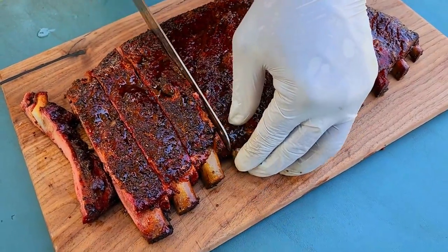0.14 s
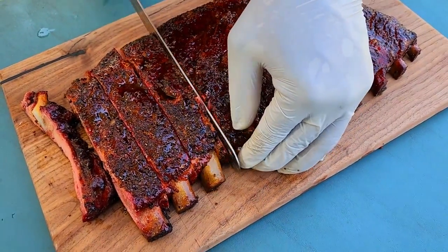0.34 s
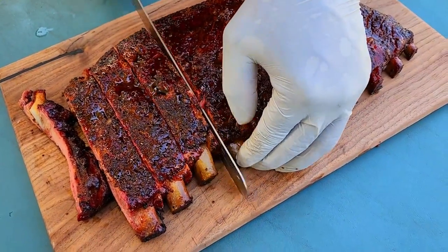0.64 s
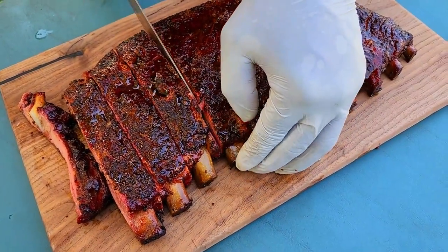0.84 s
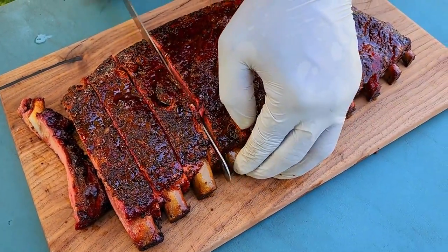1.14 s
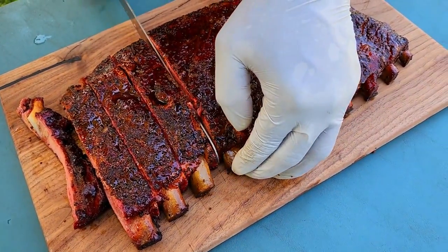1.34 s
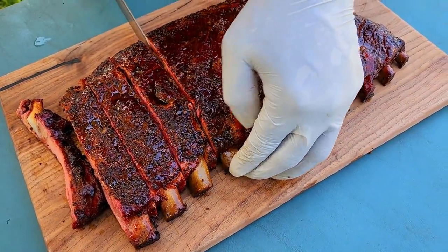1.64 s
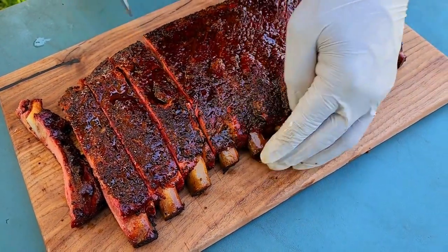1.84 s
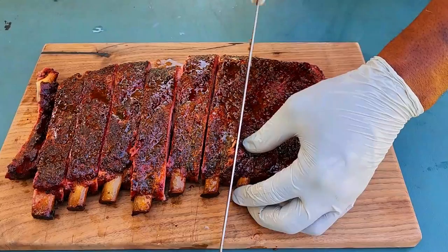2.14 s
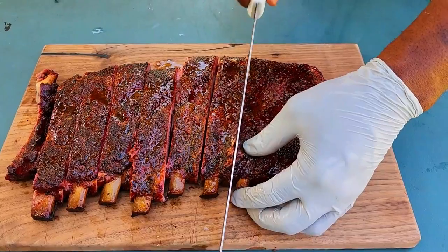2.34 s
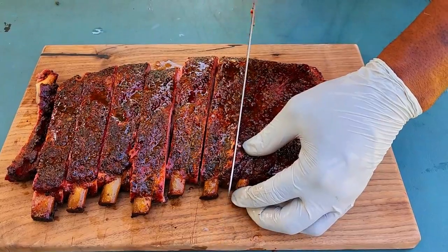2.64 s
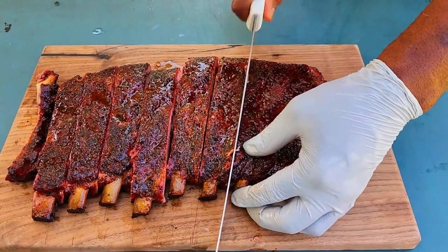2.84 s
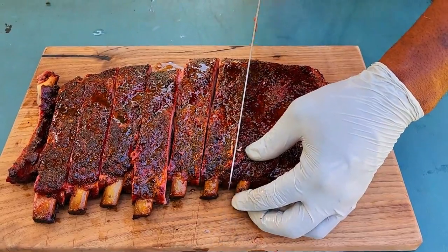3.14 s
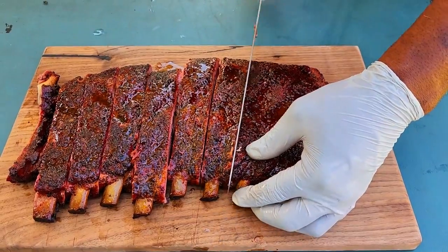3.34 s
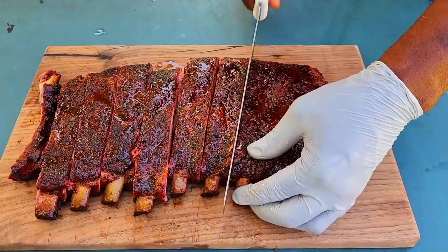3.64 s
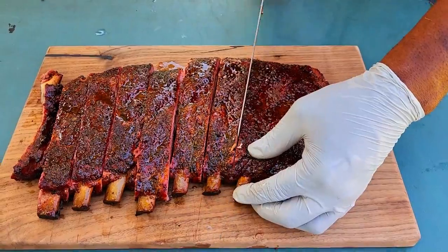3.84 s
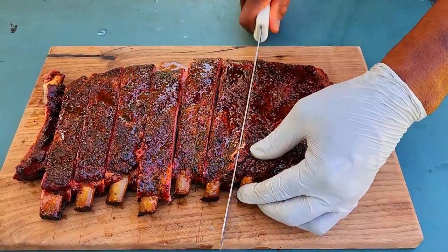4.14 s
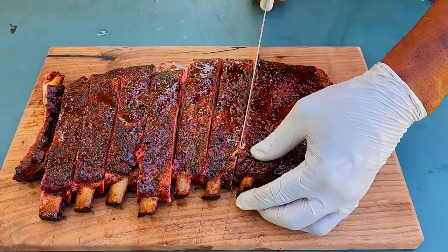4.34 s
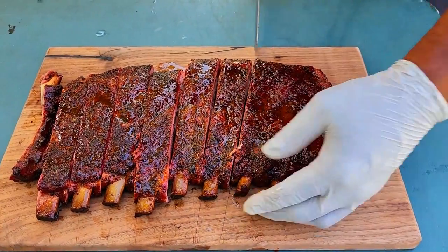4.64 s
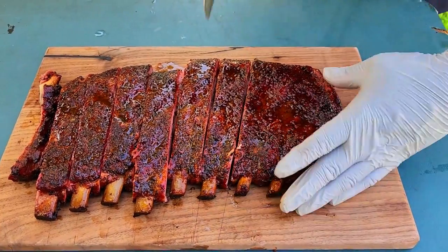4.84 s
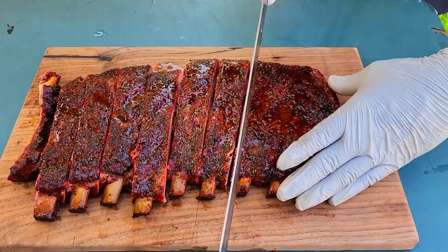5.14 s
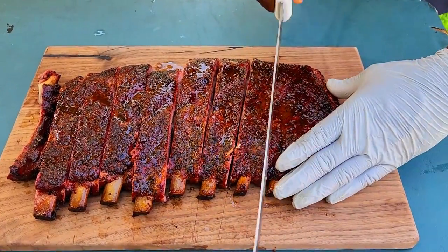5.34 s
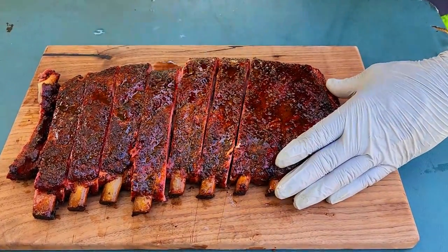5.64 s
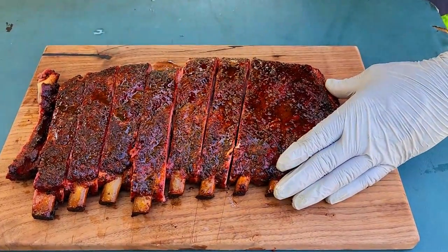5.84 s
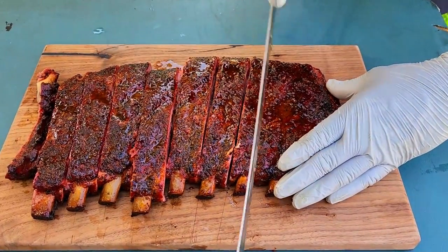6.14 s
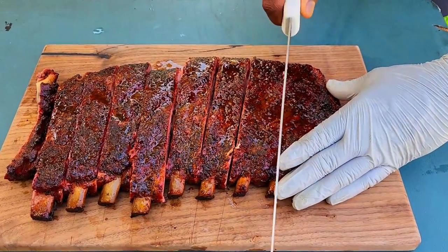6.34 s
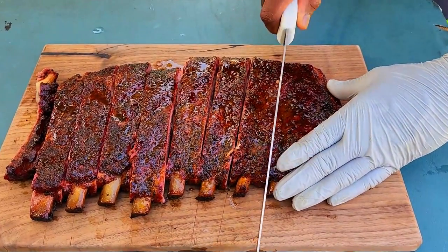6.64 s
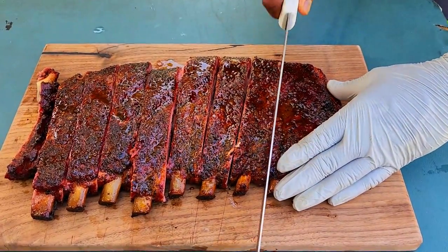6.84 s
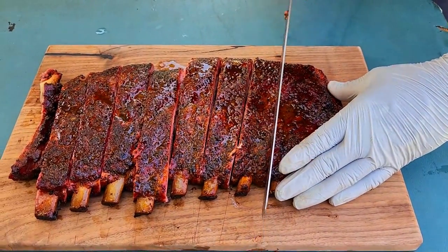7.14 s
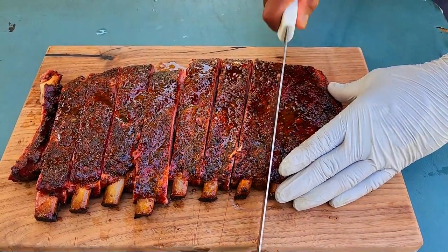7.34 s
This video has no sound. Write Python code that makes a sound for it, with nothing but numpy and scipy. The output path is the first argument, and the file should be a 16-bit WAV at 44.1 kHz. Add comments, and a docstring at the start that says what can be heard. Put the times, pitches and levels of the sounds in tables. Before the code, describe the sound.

Outdoors, close stereo microphones, with a soft low motor rumble and hum throughout. Around 0.4 s a long knife bites into crusty ribs: a sharp knock on the wooden board at 0.5, then a brief scrape and light snaps of crust. Short rasping strokes follow from 1.15 to 1.9, woody with a ringing blade, then fainter crackle. At 2.2 the edge skips in a quick run of knocks, with another small run near 2.5 and hard taps at 2.8-2.9. Scrapes return from 3.4, growing busy between 4.0 and 4.75, with a crisp snap at 4.13. Insects' throbbing hiss swells to its peak near 4.2 and stays. The knife rests from about 5 s; a single insect holds a thin high note around 6.3-6.8. Thin, falling bird whistles come at 2.3, 3.6, 6.2, 7.1 and 7.4. A final scraping stroke rattles rapidly on wood from 7.3 to the end at 7.5.

```python
"""A long knife saws through barbecued ribs on a wooden board outdoors, close by, over hum and insects.
From the first half second its blade crackles through the crust and scrapes the wood: filtered random clicks.
In places it skips in quick runs of knocks, which are short clicks that ring the wood and the blade.
The insects, throbbing noise, swell loudest near 4 s; then the knife rests until a last stroke after 7 s.
A small bird whistles thinly from 2 s on, and for a moment after 6 s one insect holds a thin note."""
import sys
import numpy as np
from scipy import signal
from scipy.fft import rfft, irfft, next_fast_len
from scipy.io import wavfile
from scipy.ndimage import uniform_filter1d

SR = 44100
rng = np.random.default_rng(int(sys.argv[2]) if len(sys.argv) > 2 else 0)


def int16_out(signal):
    """Quantize to a 16-bit WAV file."""
    q = np.round(np.clip(np.atleast_2d(signal).T, -1, 1) * 32767)
    wavfile.write(sys.argv[1], SR, q.astype(np.int16))


N = 330309
TIME = np.arange(N) / SR

# strokes of the knife, with levels at the stroke's end, before each layer's own trim:
# (start [s], attack [s], hold [s], release [s], scrape level [dB], drag level [dB], crust level [dB],
#  blade pitch [Hz], blade ring [dB], juicy fizz [dB], upper ring pitch [Hz], upper ring [dB],
#  pitch muted by the contact [Hz], ring of bare wood [dB], drag pitch [Hz])
KNIFE_STROKES = [(0.39, 0.047, 0.05, 0.018, -49, -45, -56.5, 840, 5, -0.5, 1300, -6, 480, -9, 200),
                 (0.487, 0.0097, 0.048, 0.082, -28.5, -31.5, -42.5, 884, 9.5, 0.5, 1720, 12, 470, -8, 152),
                 (0.67, 0.055, 0.042, 0.021, -40.5, -46, -49, 810, 15, 0, 1740, 8, 480, -18, 200),
                 (1.141, 0.013, 0.035, 0.023, -45, -56, -50, 830, 4, 0.5, 1870, 11, 360, -10, 250),
                 (1.19, 0.017, 0.043, 0.045, -33, -43.5, -42.5, 835, 3, 0.5, 1110, -7, 363, -8, 496),
                 (1.247, 0.035, 0.032, 0.04, -37.5, -45, -50.5, 820, 4, 0.5, 1920, 14, 370, -2, 460),
                 (1.368, 0.093, 0.14, 0.066, -35, -40, -45, 830, 11.5, -0.5, 1800, -7, 1060, -6, 527),
                 (1.59, 0.058, 0.11, 0.1, -35, -40, -51, 774, 4.5, 1.5, 1610, 5, 1070, -12, 513),
                 (1.788, 0.033, 0.04, 0.048, -36.5, -39, -64, 610, 5, 0, 1590, 3, 1160, -9, 373),
                 (1.863, 0.16, 0.14, 0.025, -64, -64, -54.5, 790, 22, 0.5, 1400, -6, 1100, -10, 250),
                 (2.2, 0.013, 0.062, 0.079, -29.5, -31, -53, 1010, -1, 0, 1660, 0, 840, 2, 260),
                 (2.445, 0.029, 0.021, 0.043, -40.5, -54, -52.5, 1000, 13, -6, 1640, 4, 840, -2, 260),
                 (2.831, 0.0051, 0.035, 0.041, -30, -34, -54, 1010, -3, 0.5, 1440, -0.5, 517, -4, 280),
                 (2.865, 0.02, 0.027, 0.057, -31, -27.5, -46, 990, 9, -5.5, 1710, 4, 520, -7, 279),
                 (2.946, 0.024, 0.12, 0.09, -56, -62, -53, 1100, -3, -14, 1720, 6, 600, -7, 260),
                 (3.426, 0.051, 0.046, 0.056, -35.5, -45, -40.5, 1080, -0.5, -10, 2010, -7, 890, 4, 298),
                 (3.56, 0.17, 0.19, 0.12, -52.5, -78, -55.5, 1100, 11, 4.5, 1920, -2, 810, -4, 280),
                 (3.978, 0.083, 0.055, 0.042, -37, -45.5, -45.5, 695, 6, -2, 1890, -3, 900, -7, 280),
                 (4.124, 0.021, 0.058, 0.047, -28.5, -33.5, -42.5, 970, -6, 2, 1820, 20, 775, 8, 284),
                 (4.225, 0.043, 0.016, 0.017, -46, -62, -53, 1000, -3, -0.5, 1780, 3, 950, 14, 280),
                 (4.33, 0.022, 0.068, 0.05, -40.5, -52, -42.5, 1030, -11, 0.5, 1780, 7, 1140, 5, 300),
                 (4.398, 0.048, 0.21, 0.016, -35, -52, -45.5, 970, 8, -0.5, 1680, -8, 1150, -8, 450),
                 (4.652, 0.0044, 0.037, 0.014, -25, -41.5, -49.5, 1030, 16, 0, 1250, -2, 460, 5, 557),
                 (4.694, 0.019, 0.017, 0.02, -31, -38, -50, 1090, 14, -3, 1820, 13, 480, 6, 258),
                 (4.715, 0.023, 0.051, 0.16, -59, -66, -53, 1080, 0, 0, 1800, 5, 600, 0, 260),
                 (7.325, 0.016, 0.054, 0.057, -25.5, -28.5, -49, 1030, 6, -2, 1680, 4, 825, 1, 262)]
# the edge knocks on the board, alone or in skipping runs:
# (time [s], level [dB], thud against the level [dB], contact pitch [Hz], ring of the blade [dB])
EDGE_KNOCKS = [(0.4911, -11, -7, 754, 0), (0.511, -28, -9, 865, 7), (0.5255, -21, -20, 900, 14),
               (0.554, -28, -6, 854, 12), (0.682, -41, 3, 804, 1), (1.7105, -28, -7.5, 776, 3),
               (2.2, -23.5, -1, 986, 6), (2.2136, -14, -8.5, 1420, -17), (2.234, -23.5, 4, 980, -4),
               (2.255, -28.5, 5, 1020, -6), (2.2769, -26.5, 3, 1300, -11), (2.284, -34, -2, 1280, -11),
               (2.3064, -30, 2.5, 990, -8.5), (2.463, -40.5, -2, 1710, 1), (2.4807, -27.5, -2, 1330, -18),
               (2.4997, -31.5, -2, 1580, -1), (2.8336, -24.5, 0, 1310, -17), (2.862, -28, -5, 1380, 7),
               (2.89, -15.5, -6.5, 975, -2), (2.9087, -17, -7, 970, -2), (3.027, -43, -2, 656, 12),
               (3.652, -43.5, -4, 800, 0), (4.132, -24, 3.5, 650, -4), (4.662, -27, -16, 650, 6),
               (4.7164, -27, -13, 1110, -4), (7.330, -18, -4.5, 1300, -12), (7.3468, -18.5, -2, 1015, -2),
               (7.3623, -13.5, -3.5, 1260, -8), (7.378, -14, -2.5, 1033, -7.5),
               (7.3946, -23.5, 4.5, 1640, 4), (7.413, -27.5, 1.5, 1020, -2), (7.424, -36, -3, 1500, -2),
               (7.439, -38.5, 2.5, 1100, -2)]
# narrow modes of the board, woken by the edge on bare wood: (pitch [Hz], width [Hz], level [dB])
WOOD_MODES = [(714, 70, -8.5), (947, 34, -5.5), (1030, 44, 5.5), (1226, 30, 0), (1340, 82, -3),
              (1710, 41, -2.5), (1860, 42, 2.5), (1975, 26, -1.5), (2203, 25, 7.5), (2316, 27, -2)]
# high modes of the blade: (pitch [Hz], width [Hz], level [dB])
STEEL_MODES = [(5470, 100, 2), (6250, 64, 3), (7460, 200, 0), (7740, 130, -15)]
# left-right likeness of the board's sound: (frequency [Hz], likeness [-1..1])
NEAR_LIKENESS = [(200, 0.99), (700, 0.97), (1100, 0.93), (1800, 0.62), (2700, 0.042), (16000, 0.013)]
# left-right likeness of the background: (frequency [Hz], likeness [-1..1])
FAR_LIKENESS = [(30, 1), (75, 0.97), (135, 1), (280, 0.72), (600, 0.46), (1200, -0.15), (3000, -0.031),
                (16000, -0.11)]


def from_db(db):
    """Decibels to gain."""
    return 10 ** (np.asarray(db) / 20)


def rms_one(x):
    """Scale to unit rms (average strength)."""
    return x / np.sqrt(np.mean(x ** 2) + 1e-20)


def peak_one(x):
    """Scale to unit peak."""
    return x / (np.abs(x).max() + 1e-20)


def even(x, size):
    """Hold the loudness steady over a window of size samples."""
    return x / np.sqrt(uniform_filter1d(np.mean(x ** 2, axis=0), size=size) + 1e-20)


def in_time(rows):
    """Turn the columns of a timed table into curves, sample by sample."""
    s, *columns = np.transpose(rows)
    return [np.interp(TIME, s, c) for c in columns]


def frequencies(size):
    """The frequencies [Hz] of a spectrum of size samples."""
    return np.arange(size // 2 + 1) * SR / size


def at_hz(points, hz):
    """Read a table of frequencies on a log-frequency axis."""
    f, value = np.transpose(points)
    return np.interp(np.log(hz + 1), np.log(f), value)


def add(out, s, sound):
    """Mix a sound in at time s."""
    i = max(0, round(s * SR))
    out[:, i:i + sound.shape[-1]] += sound[..., :max(0, N - i)]


def drift(rate):
    """A random curve of rms 1, with rate new random points per second."""
    knots = rng.standard_normal(int(N / SR * rate) + 2)
    return rms_one(np.interp(TIME * rate, np.arange(len(knots)), knots))


def noise():
    """Two channels of plain hiss."""
    return rng.standard_normal((2, N))


def grains(per_s, size_db):
    """Two streams of random clicks of uneven size."""
    sizes = from_db(size_db * np.minimum(rng.exponential(1, (2, N)), 4))
    return (rng.random((2, N)) < per_s / SR) * sizes * rng.choice([-1, 1], (2, N))


def low_pass(x, hz, order=2):
    """Take away what lies above hz (Butterworth filter)."""
    return signal.sosfilt(signal.butter(order, min(hz, .45 * SR), fs=SR, output="sos"), x)


def resonate(x, hz, width_hz):
    """One resonance, gain 1 on top."""
    r = np.exp(-np.pi * width_hz / SR)
    feed = np.array([1, 0, -1]) * (1 - r * r) / 2
    back = [1, -2 * r * np.cos(2 * np.pi * hz / SR), r * r]
    return signal.lfilter(feed, back, x + 1e-18)


def modes(x, table):
    """Parallel resonances from rows (pitch, width, level)."""
    return sum(from_db(db) * resonate(x, hz, width) for hz, width, db in table)


def glide(x, hz, width_hz):
    """A resonance whose centre follows a curve: shift it down to 0 Hz, smooth, shift back."""
    turn = np.exp(2j * np.pi * np.cumsum(hz) / SR)
    r = np.exp(-np.pi * width_hz / SR)
    return 2 * (turn * signal.lfilter([1 - r], [1, -r], x / turn)).real


def spread(pair, likeness, spectrum=((20, 0), (20000, 0))):
    """Two unrelated signals become left and right, with a colour and a likeness per frequency."""
    size = next_fast_len(pair.shape[-1])
    hz = frequencies(size)
    mid, side = rfft(pair, size) * from_db(at_hz(spectrum, hz))
    alike = np.clip(at_hz(likeness, hz), -1, 1)
    both = np.sqrt(1 + alike) * mid + np.sqrt(1 - alike) * side * [[1], [-1]]
    return rms_one(irfft(both, size)[:, :pair.shape[-1]])


def strokes():
    """Each stroke presses in, holds and lets go; gives the gains of scrape, drag and crust."""
    press_curve = 1.19   # above 1, pressure comes and goes with a soft foot
    # order: scrape, drag, crust
    # change over a stroke: the drag grows, the crust grows slightly, the scrape holds
    change_db = np.array([[0], [1.5], [0.5]])
    rest_db = [[-76], [-75], [-69]]   # faint rubbing between strokes
    gains = np.zeros((3, N))
    for start, attack, hold, release, *levels_db in np.array(KNIFE_STROKES)[:, :7]:
        length = attack + hold + release
        t = TIME[:int(length * SR)]
        ramps = np.minimum(t / attack, (length - t) / release)
        press = np.clip(ramps, 0, 1) ** press_curve
        add(gains, start, press * from_db(np.c_[levels_db] + change_db * (t / length - 1.0)))
    return np.hypot(gains, from_db(rest_db))


def contact():
    """Pitches, rings and juiciness of the cut glide from the middle of one stroke to the next."""
    return in_time([(row[0] + row[1] + row[2] / 2, *row[7:]) for row in KNIFE_STROKES])


def board(x, top_hz=2050):
    """The wood passes the push on, rings in its modes and radiates little treble."""
    # resonances of the board on its table: (pitch [Hz], width [Hz], level over the direct sound [dB])
    board_modes = [(119, 41, 13.5), (193, 85, 7), (307.5, 46, 7.5), (627, 130, 5.5), (988, 180, -1.5),
                   (1340, 227, 9), (1700, 28, -5)]
    return low_pass(x + modes(x, board_modes), top_hz, order=10)


def scrape(gain, blade_hz, blade_db, upper_hz, upper_db, node_hz, wood_db):
    """The edge catches on the grain in dense, tiny slips that ring blade and wood; one pitch is muted."""
    # colour of the slips: (frequency [Hz], level [dB per Hz])
    slip_spectrum = [(200, -52), (350, -16.5), (470, 1), (600, -1.5), (800, 3), (1120, -2), (1500, -4),
                     (1950, -2), (2500, 0), (4000, 11)]
    node_depth, judder_db, trim_db = 0.39, 1.0, -5
    jitter = from_db(0.26 * drift(25))   # the contact point is never still
    slips = spread(grains(per_s=7000, size_db=1.5), NEAR_LIKENESS, slip_spectrum)
    blade = from_db(blade_db) * glide(slips, blade_hz * jitter, width_hz=120)
    upper = from_db(upper_db) * glide(slips, upper_hz * jitter, width_hz=160)
    bare_wood = from_db(wood_db) * modes(slips, WOOD_MODES)
    rasp = board(slips + blade + upper + bare_wood)
    rasp = rasp - node_depth * glide(rasp, node_hz, width_hz=170)
    return gain * even(rasp, size=400) * from_db(judder_db * drift(110) + trim_db)


def drag(gain, drag_hz, width_hz=240, trim_db=-5.5):
    """The blade drags on the board with a low growl whose pitch follows the contact."""
    slips = spread(grains(per_s=3000, size_db=2.5), NEAR_LIKENESS)
    growl = board(glide(glide(slips, drag_hz, width_hz), drag_hz, width_hz))
    return gain * even(growl, size=1024) * from_db(trim_db)


def bearing(touch_s=0.0091, airborne_db=-9):
    """How firmly the edge bears on the wood: while it skips, it rubs fully only around each knock."""
    # spells in which the edge skips over the wood: (from [s], to [s])
    skip_spells = [(2.195, 2.34), (2.45, 2.52), (2.895, 2.909), (7.325, 7.42)]
    firm, touches, t = np.ones(N), np.zeros((1, N)), TIME[:2 ** 11]
    for start, end in skip_spells:
        firm[(TIME > start) & (TIME < end)] = from_db(airborne_db)
    for s, *_ in EDGE_KNOCKS:
        add(touches, s, np.exp(-(t / touch_s) ** 2))
    return uniform_filter1d(np.maximum(firm, touches[0]), size=64)


def bend(x, delay_s=0.00149, ref_hz=300):
    """Bending waves: travel time falls with the root of frequency, so the thud follows the crack."""
    size = x.shape[-1]
    phase = 4 * np.pi * delay_s * np.sqrt(ref_hz * frequencies(size))
    return irfft(rfft(x) * np.exp(-1j * phase), size)


def knocks():
    """Each knock cracks on the wood, rings the blade and thuds; crack and thud echo from the far edge."""
    thud_low_hz, thud_hz = 150, 470
    thud_echo_s, thud_echo_db, crack_echo_s, crack_echo_db = 0.0057, -10, 0.0068, -14
    wood_db, steel_db, steel_t60_s = -3, -25, 0.1   # t60: time to fade by 60 dB
    out, t = np.zeros((2, N)), TIME[:2 ** 13]
    click = signal.unit_impulse(len(t))
    push = signal.sosfilt(signal.butter(1, [thud_low_hz, thud_hz], "band", fs=SR, output="sos"), click)
    thud = peak_one(bend(board(low_pass(push, thud_hz))))
    thud = thud + from_db(thud_echo_db) * np.interp(t - thud_echo_s, t, thud)
    for s, db, heavy_db, hz, ring_db in EDGE_KNOCKS:
        hit = resonate(click, hz, width_hz=1500)
        crack = peak_one(bend(board(hit + from_db(wood_db) * modes(hit, WOOD_MODES))))
        late = crack_echo_s * rng.uniform(0.86, 1.15)
        crack = crack + from_db(crack_echo_db) * np.interp(t - late, t, crack)
        # two resonances in a row: the ring builds up over a few cycles
        ring = peak_one(bend(resonate(resonate(click, hz, 100), hz, 500)))
        blow = peak_one(crack + from_db(ring_db) * ring) + from_db(heavy_db) * thud
        # treble straight from the blade
        burst = rng.standard_normal((2, len(t))) * from_db(-60 * t / steel_t60_s)
        bright = resonate(burst, 2500, 2200)
        steel = peak_one(low_pass(bright + modes(bright, STEEL_MODES), 10000, order=6))
        add(out, s, from_db(db) * (blow + from_db(steel_db) * steel))
    return out


def radiate(x, table):
    """Each pitch leaves the board with its own lead and balance between left and right."""
    size, apart = next_fast_len(N), np.array([[.5], [-.5]])
    hz, table = frequencies(size), np.array(table)
    lead = at_hz(table[:, [0, 1]], hz)
    balance_db = at_hz(table[:, [0, 2]], hz)
    turned = from_db(apart * balance_db) * np.exp(1j * apart * lead)
    return irfft(rfft(x, size) * turned, size)[:, :N]


def crust(crust_gain, fizz_db):
    """Crust and fibres part in clumps of minute cracks that make the steel sing; juice fizzes above."""
    # colour of the cracks: (frequency [Hz], level [dB per Hz])
    crack_spectrum = [(1500, -11), (2700, -1.5), (3400, -2.5), (4600, 2), (5600, 2.5), (7500, -2.5),
                      (8300, -6.5), (9000, -30), (12000, -45), (16500, -36)]
    # colour of the juice: (frequency [Hz], level [dB per Hz])
    fizz_spectrum = [(5000, -24), (8000, -10), (10000, -16.5), (12500, -17), (14300, -18.5), (16500, -7)]
    focus_db, clump_db, fizz_trim_db = 8, 1.1, -5.5
    centre_hz = 7380 * 2 ** (0.67 * fizz_db)   # the juicier the cut, the higher it crackles
    cracks = spread(grains(per_s=4000, size_db=2.0), NEAR_LIKENESS, crack_spectrum)
    cracks = cracks + from_db(focus_db) * glide(cracks, centre_hz, width_hz=1300)
    cracks = rms_one(cracks + modes(cracks, STEEL_MODES))
    fizz = spread(noise(), NEAR_LIKENESS, fizz_spectrum) * from_db(fizz_db + fizz_trim_db)
    return (cracks + fizz) * crust_gain * from_db(clump_db * drift(130))


def snaps(tick_t60_s=0.011, edge_t60_s=0.0084, edge_db=-18):
    """A larger flake breaks: a sharp broad edge with a short tick that is duller the lower it is."""
    # bits of crust snap: (time [s], level [dB], pitch [Hz])
    flakes = [(0.365, -53, 8400), (0.491, -32, 5600), (0.606, -34.5, 7240), (0.635, -30, 2100),
              (0.930, -39, 6800), (1.134, -32, 1500), (1.135, -32, 6760), (1.161, -28, 6600),
              (3.007, -36, 2200), (4.128, -18, 5660), (4.737, -30.5, 7760), (4.879, -35, 1960),
              (7.365, -32, 6600)]
    out, t = np.zeros((2, N)), TIME[:2 ** 11]
    for s, db, hz in flakes:
        burst = rng.standard_normal((2, len(t)))
        tick = resonate(burst * from_db(-60 * t / tick_t60_s), hz, max(hz / 5.3, 1700))
        tick = low_pass(tick, hz * 1.1)
        edge = burst * from_db(-60 * t / edge_t60_s)
        add(out, s, from_db(db) * (peak_one(tick) + from_db(edge_db) * peak_one(edge)))
    return out


def bumps(rise_s=.013):
    """Soft meat pushes the board for a few slow cycles."""
    # ribs and knife push the whole board against the table: (time [s], peak level [dB], pitch [Hz])
    pushes = [(0.41, -32.5, 96), (0.512, -35, 112), (0.548, -28, 63), (0.67, -36, 71.5), (1.132, -37, 84.5),
              (1.86, -37, 106), (2.052, -30, 82), (2.224, -29, 54), (2.32, -32, 134.2), (7.354, -29, 56.4)]
    out, t = np.zeros((2, N)), TIME[:2 ** 13]
    for s, db, hz in pushes:
        swell = t ** 2 * np.exp(-2 * t / rise_s)
        add(out, s, from_db(db) * peak_one(swell * np.sin(2 * np.pi * hz * t)))
    return out


def insects():
    """Insects merge into a swelling, throbbing hiss, with a thin top layer that rises faster than the rest."""
    # the chorus: (time [s], level [dB], throbs per second [Hz], depth of the throb [dB])
    chorus = [(0, -59.5, 31, 1), (1, -58, 55, 1), (1.7, -54.5, 38, -0.5), (2.1, -55.5, 40, 3),
              (2.7, -56, 34, 0.5), (3.3, -56, 34, 1.5), (3.85, -49.5, 37, 2), (4.2, -45.5, 24, 3.5),
              (4.7, -49, 21.7, 2.5), (5.15, -51.5, 20.3, 0.5), (6.3, -50.5, 22, 1.2), (7.1, -52.5, 23, 1),
              (7.49, -53, 23, 1)]
    # colour of the hiss: (frequency [Hz], level [dB per Hz])
    hiss_spectrum = [(1700, -17), (2300, 4), (2800, -2.5), (3500, 4), (4700, 1), (5600, 5.5), (6600, 4.5),
                     (7500, 1), (8300, 0), (9000, -11.5), (12000, -55), (16000, -31)]
    # pitches at which the insects crowd: (pitch [Hz], width [Hz], level [dB])
    trill_modes = [(3225, 93, 1), (3920, 930, -9), (7460, 360, 4.5)]
    # colour of the thin high hiss: (frequency [Hz], level [dB per Hz])
    top_spectrum = [(6000, -26), (9000, -5.5), (12500, -5.5), (16000, -14)]
    flutter_db, top_db, top_db_per_db = 0.58, -18, 0.5
    chorus_db, throb_hz, throb_db = in_time(chorus)
    hiss = spread(noise(), FAR_LIKENESS, hiss_spectrum)
    hiss = rms_one(hiss + modes(hiss, trill_modes))
    top = spread(noise(), FAR_LIKENESS, top_spectrum)
    hiss = hiss + top * from_db(top_db + top_db_per_db * (chorus_db - chorus_db.max()))
    throb = np.sin(2 * np.pi * np.cumsum(throb_hz) / SR)
    return hiss * from_db(chorus_db + throb_db * throb + flutter_db * drift(60))


def soloist(hz=7310, width_hz=130):
    """A single insect stands out of the chorus for a moment: noise through a narrow double resonance."""
    # its thin note: (time [s], level [dB])
    solo = [(6.15, -85), (6.3, -60), (6.7, -57), (6.95, -83)]
    level_db, = in_time(solo)
    note = resonate(resonate(noise(), hz, width_hz), hz, width_hz)
    return from_db(level_db) * rms_one(note)


def bird():
    """A thin, slightly buzzy whistle that arches and falls, blurred by the garden's echoes."""
    # bird calls: (time [s], level [dB], top pitch [Hz])
    calls = [(2.310, -43.5, 7290), (3.561, -42.5, 7400), (6.19, -47, 7300), (7.142, -44, 7360),
             (7.422, -49, 6920)]
    # shape of every call: (time [s], pitch against the top [Hz], gain [0..1])
    call_shape = [(0, -220, 0), (0.01, -80, 0.8), (0.025, 0, 1), (0.048, -120, 0.7), (0.064, -470, 0.75),
                  (0.082, -700, 0.6), (0.092, -780, 0)]
    warble_hz, echo_t60_s, direct_share, echo_share = 70, 0.28, 0.41, 0.98
    out, t = np.zeros((2, N)), TIME[:2 ** 14]
    arch_hz, swell = (curve[:len(t)] for curve in in_time(call_shape))
    for s, db, hz in calls:
        pitch = hz + arch_hz + warble_hz * drift(385)[:len(t)]
        call = swell * np.sin(2 * np.pi * np.cumsum(pitch) / SR)
        echoes = rng.standard_normal((2, len(t))) * from_db(-60 * t / echo_t60_s)
        blurred = peak_one(signal.fftconvolve(echoes, call[None])[:, :len(t)])
        add(out, s, from_db(db) * (direct_share * call + echo_share * blurred))
    return out


def machine(rumble_db=-47.5, hum_trim_db=-1.0):
    """A distant motor: low rumble of filtered noise with wavering tones."""
    # colour of the rumble: (frequency [Hz], level [dB per Hz])
    rumble_spectrum = [(12, -72), (22, -8.5), (45, -1.5), (80, -2), (102, -5), (123, -3), (177, -9),
                       (196, -11), (294, -17), (319, -33), (399, -26), (576, -19.5), (1110, -25),
                       (1330, -24.5), (1590, -27), (2600, -29), (3380, -35.5), (5720, -120)]
    # tones of the motor, before the trim: (pitch [Hz], rms level [dB])
    hum_tones = [(75.4, -52), (129.2, -55), (166.9, -59.5), (699.8, -70), (1287, -64), (1346, -69.5)]
    out = from_db(rumble_db) * spread(noise(), FAR_LIKENESS, rumble_spectrum)
    for hz, db in hum_tones:
        # a phase step between left and right gives the tone its likeness
        apart = np.arccos(np.clip(at_hz(FAR_LIKENESS, hz), -1, 1))
        phase = 2 * np.pi * hz * TIME + 0.38 * drift(12) + np.array([[0], [apart]])
        level = np.sqrt(2) * from_db(db + hum_trim_db + 1.97 * drift(7))
        out = out + level * np.sin(phase)
    return out


def scene():
    """Knife and board in front, the garden behind."""
    # the board lies aslant at first; its modes reach the microphones out of step:
    # (frequency [Hz], lead of the left [rad], left minus right [dB])
    aslant = [(200, 0.5, 0), (900, -0.04, -1.5), (1110, 1.6, 1), (1260, 1.07, 5.5), (1630, 2.5, 2),
              (1870, 1, -4), (2210, 1.7, 1), (2800, -1, 2)]
    # then it lies square to the microphones: (frequency [Hz], lead of the left [rad], left minus right [dB])
    square = [(200, -0.034, 0.5), (600, 0.5, 1), (800, 1, -1.5), (1000, 0.8, 1), (1150, 1.8, 0),
              (1280, -0.55, 5), (1550, -0.64, 2), (1760, -0.31, -3), (1900, 1.74, 2.5), (2800, -0.22, -4)]
    turn_s = 2.15
    scrape_gain, drag_gain, crust_gain = strokes()
    blade_hz, blade_db, fizz_db, upper_hz, upper_db, node_hz, wood_db, drag_hz = contact()
    rubbing = scrape(scrape_gain, blade_hz, blade_db, upper_hz, upper_db, node_hz, wood_db)
    rubbing = rubbing + drag(drag_gain, drag_hz)
    wood = knocks() + bearing() * rubbing
    wood = np.where(TIME < turn_s, radiate(wood, aslant), radiate(wood, square))
    knife = wood + crust(crust_gain, fizz_db) + snaps() + bumps()
    return knife + machine() + insects() + soloist() + bird()


def record(dry):
    """The two microphones differ in colour; the top is cut steeply."""
    # colour of the left microphone against the right: (frequency [Hz], level [dB])
    mic_balance = [(150, 0), (700, 1), (1200, 0), (2400, -0.5), (3600, -2.5), (5200, 0), (6300, -2.5),
                   (7600, -5.5), (9000, -7.5), (10700, 3.5), (13200, -5.5), (15000, 3)]
    cutoff_hz = 15750
    size = next_fast_len(N)
    sides = from_db(at_hz(mic_balance, frequencies(size)) * np.array([[.5], [-.5]]))
    sides = sides / np.sqrt(np.mean(sides ** 2, axis=0))   # keeps the power of both sides together
    heard = irfft(rfft(dry, size) * sides, size)[:, :N]
    return signal.sosfilt(signal.ellip(12, .1, 90, cutoff_hz, fs=SR, output="sos"), heard)


dry = scene()
out = record(dry)
int16_out(out)
```